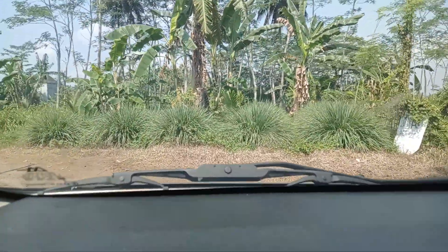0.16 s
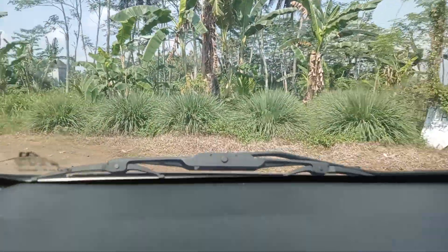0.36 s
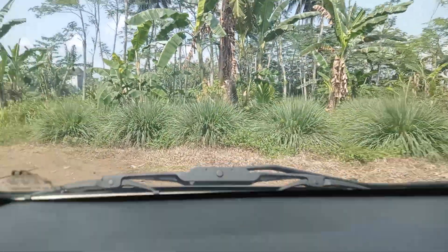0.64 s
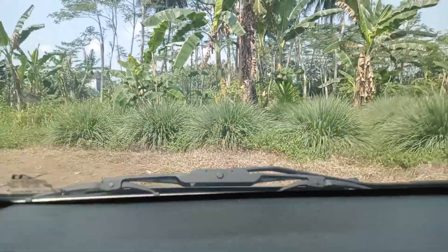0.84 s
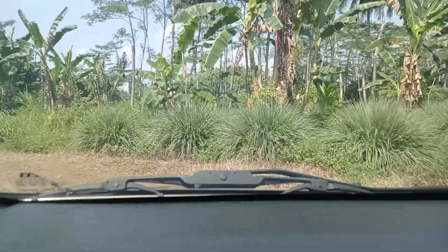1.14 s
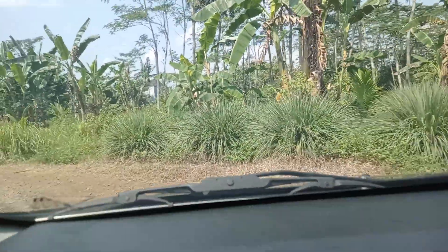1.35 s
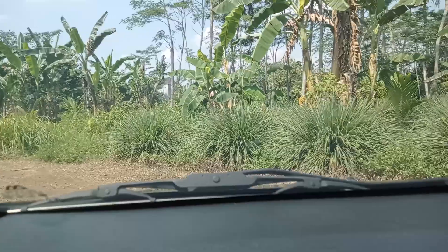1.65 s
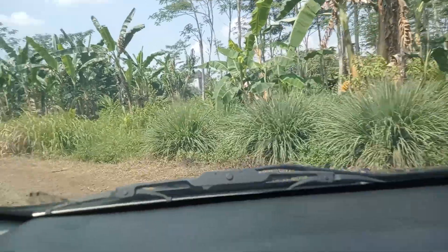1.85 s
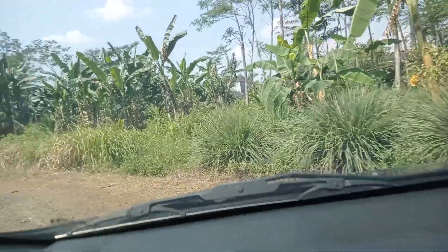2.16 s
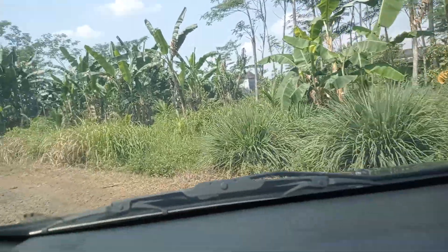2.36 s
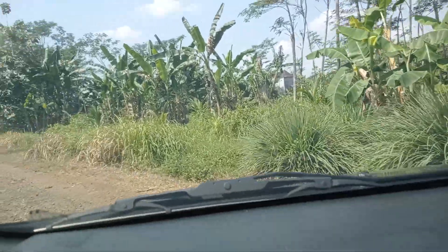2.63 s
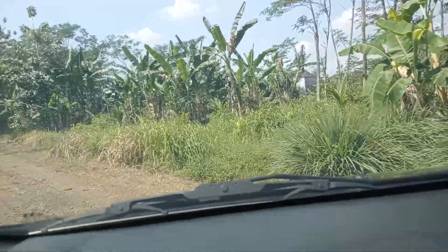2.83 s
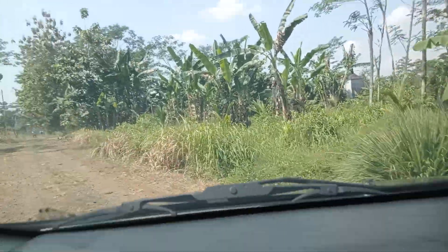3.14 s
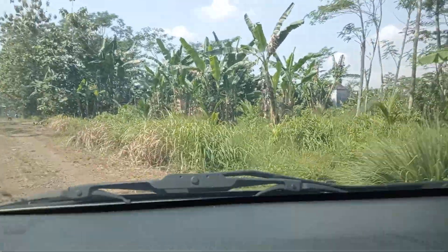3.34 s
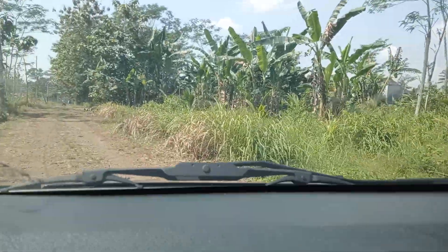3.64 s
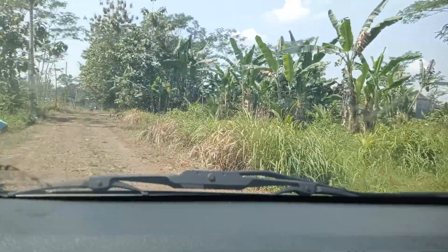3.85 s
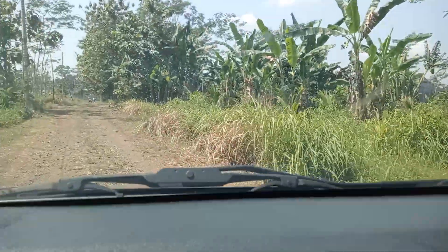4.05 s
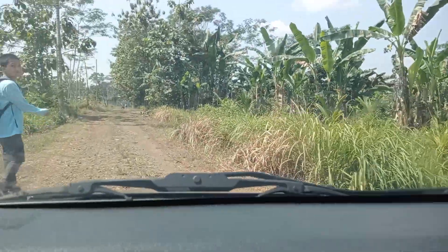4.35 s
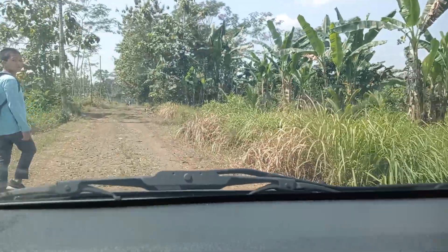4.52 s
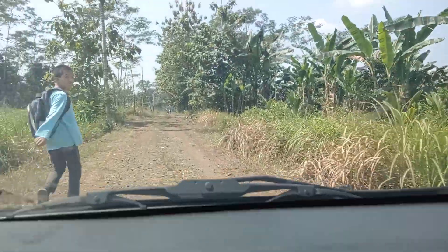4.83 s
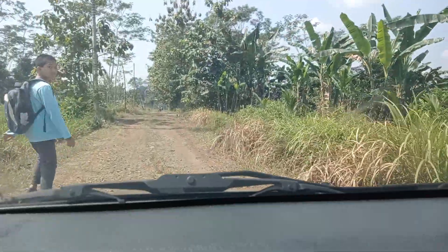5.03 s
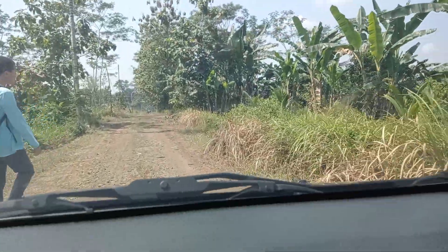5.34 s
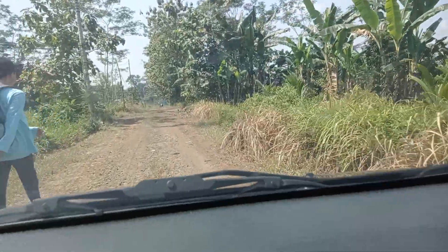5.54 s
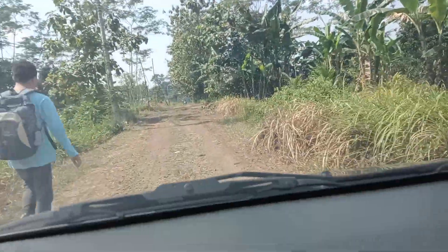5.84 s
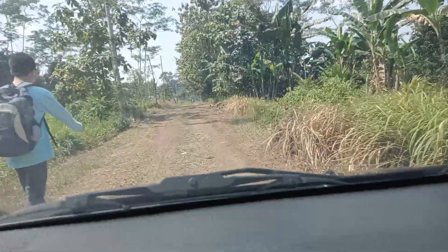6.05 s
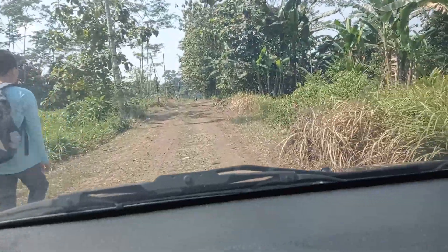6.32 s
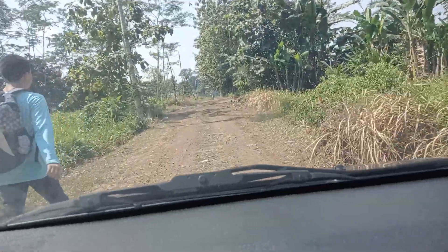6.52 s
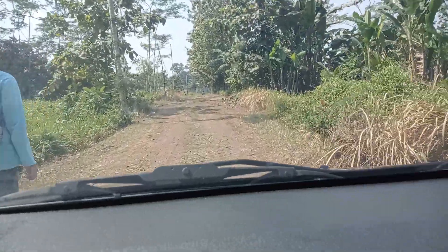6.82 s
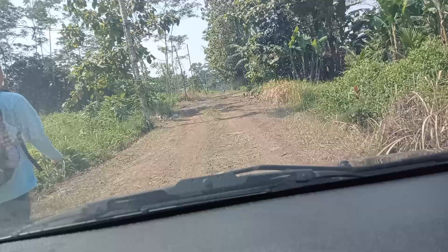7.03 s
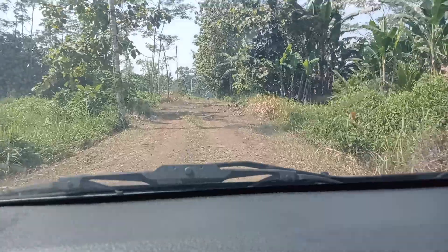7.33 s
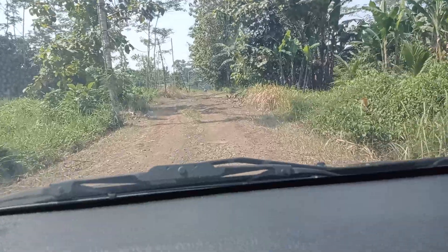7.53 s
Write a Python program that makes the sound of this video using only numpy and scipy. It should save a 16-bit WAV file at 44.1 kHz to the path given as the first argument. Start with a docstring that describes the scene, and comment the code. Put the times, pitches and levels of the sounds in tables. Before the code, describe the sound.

Inside a small car creeping over a rough dirt track, with low rumble, tyre thuds, suspension knocks and light metal clinks.

```python
"""Small car on a dirt track

One microphone inside the cabin as the car creeps over rough ground. Stones under the tyres
shake the body and make it boom, the tyres slap, and the suspension knocks in the ruts.
Behind that the engine hums and whirrs low, and grit hisses and cracks under the tread.
Close by, a small metal piece clinks with the jolts and the plastic trim ticks and rubs."""
import sys
import numpy as np
from scipy import signal
from scipy.fft import rfft, irfft, next_fast_len
from scipy.io import wavfile
from scipy.ndimage import uniform_filter1d

SR = 44100
rng = np.random.default_rng(int(sys.argv[2]) if len(sys.argv) > 2 else 0)


def digitize_waveform(pressure):
    """Quantize a signal to 16-bit integers and store it at the path in sys.argv[1].

    Rows of a 2-D input are taken as channels; values are limited to [-1, 1].
    """
    field = np.atleast_2d(pressure).T
    bounded = np.clip(field, -1, 1)
    quanta = np.round(bounded * 32767).astype(np.int16)
    wavfile.write(sys.argv[1], SR, quanta)


N = 338582
TIME = np.arange(N) / SR

# How hard the ground shakes the car between bumps, rising with speed and stoniness.
# Each row: time in seconds, relative level in dB.
GROUND_SHAKE = [(0.0, 3.5), (0.1, -6.5), (0.22, 1), (0.45, -0.5), (0.85, -5), (1.15, -1), (1.6, -2.5),
                (2.0, -3), (2.45, -9), (3.0, -6), (3.42, -7.5), (3.8, 2), (4.4, -3.5), (4.95, -1.5),
                (5.75, 1), (6.38, -0.5), (6.53, -1), (6.7, 2), (7.05, -5.5), (7.18, -0.5), (7.4, -5.5),
                (7.68, 3.5)]
# The background's rise and fall. Each row: time in seconds, relative level of engine whirr and
# stone crunch in dB, relative level of fine grit in dB.
BACKGROUND_LEVELS = [(0.0, -58, -76), (1.45, -57.5, -78.5), (1.84, -56.5, -74), (2.56, -57, -78),
                     (2.89, -59, -79.5), (3.18, -59.5, -80.5), (3.87, -53, -71.5), (4.27, -54, -70.5),
                     (4.55, -55, -74.5), (4.9, -52, -68.5), (5.17, -54.5, -74), (6.2, -55.5, -76.5),
                     (6.95, -53.5, -72), (7.68, -56, -77)]
# Spectra of fine grit, cracking stone and a dull blow. Each row: frequency in Hz, gain in dB.
GRIT_SPECTRUM = [(3000, -14), (5500, -5), (6400, -9), (7500, -7), (8400, -4), (9400, 2), (10400, -4),
                 (11600, -5), (12500, -9), (13500, -9), (14300, -12), (15500, -12)]
STONE_SPECTRUM = [(700, -10), (1500, -1), (2100, 2), (2700, -1), (3600, -8), (4700, -19), (6500, -34)]
BLOW_SPECTRUM = [(80, -36), (170, 7), (260, -12), (360, -4.5), (520, -6), (720, -10.5), (950, -12),
                 (2000, -31.5), (5000, -103)]


def from_db(db):
    """Decibels to amplitude."""
    return 10 ** (np.asarray(db) / 20)


def unit_rms(x):
    """Scale to an rms of 1."""
    return x / np.sqrt(np.mean(x ** 2) + 1e-20)


def even(x, span_s):
    """Hold the rms near 1 over the span, keeping the faster texture."""
    size = max(int(span_s * SR), 2)
    power = uniform_filter1d(uniform_filter1d(x * x, size), size)
    return x / np.sqrt(np.abs(power) + 1e-12)


def curves(rows):
    """Each column after the time column, interpolated to every sample."""
    times, *columns = np.transpose(rows)
    return [np.interp(TIME, times, column) for column in columns]


def drift(hz):
    """Random wander, mostly slower than hz, with a spread of 1."""
    rolloff = 1 + (np.fft.rfftfreq(N, 1 / SR) / hz) ** 4
    return unit_rms(irfft(rfft(rng.standard_normal(N)) / rolloff, N))


def grains(per_s, spread_db):
    """Random impacts, many small and a few large."""
    sizes = from_db(spread_db * np.minimum(rng.exponential(1, N), 4))
    return (rng.random(N) < per_s / SR) * sizes * rng.choice([-1, 1], N)


def strike_envelope(t, rise_s, length_s):
    """A fast rise and a slower decay, with a peak of 1."""
    rise = (1 - np.exp(-1.5 * t / max(rise_s, .0002))) ** 2
    shape = rise * np.exp(-2 * t / max(length_s, .002))
    return shape / shape.max()


def swells(rows):
    """A smooth rise and fall for each row of start, end and dB."""
    return sum(from_db(db) * np.sin(np.pi * np.clip((TIME - start) / (end - start), 0, 1))
               for start, end, db in rows)


def add(track, start_s, sound):
    """Mix a sound in at a time."""
    start = max(round(start_s * SR), 0)
    track[start:start + len(sound)] += sound[:N - start]


def colour(x, spectrum):
    """Minimum-phase filter through (Hz, dB) points, falling away above the last; unit power gain."""
    size = 2 * next_fast_len(len(x) // 2 + SR // 10)
    hz, db = np.transpose(spectrum)
    octave = np.log2(np.fft.rfftfreq(size, 1 / SR) + 1)
    rolloff_db = 20 * np.maximum(octave - np.log2(hz[-1]), 0)
    gain = unit_rms(from_db(np.interp(octave, np.log2(hz), db) - rolloff_db))
    cepstrum = irfft(np.log(gain))[:size // 2]
    cepstrum[1:] *= 2
    return irfft(rfft(x, size) * np.exp(rfft(cepstrum, size)))[:len(x)]


def resonance(x, hz, width_hz, lift_db):
    """Raise one band, or dip it if the lift is negative."""
    band = signal.lfilter(*signal.iirpeak(hz, hz / width_hz, fs=SR), x)
    return x + (from_db(lift_db) - 1) * band


def chatter(length_s, rise_s, spectrum, ring_hz, ring_db, q):
    """A burst of contacts on a ringing part; it swells fast and dies away."""
    t = TIME[:SR // 5]
    contacts = rng.standard_normal(len(t)) * from_db(4.0 * rng.standard_normal(len(t)))
    ringing = resonance(colour(contacts, spectrum), ring_hz, ring_hz / q, ring_db)
    return .5 * even(ringing, span_s=0.0047) * strike_envelope(t, rise_s, length_s)


def cabin(x, depth=0.42):
    """Cabin air and panels lift narrow bands of what passes through."""
    # Resonances. Each row: frequency in Hz, width in Hz, lift in dB at a depth of 1.
    cabin_modes = [(200, 20, 2), (328, 20, 2.5), (364, 18, 4), (408, 20, 2.5), (495, 20, 2), (538, 28, 4),
                   (622, 24, 5), (715, 26, 3.5), (987, 30, 3.5), (1108, 35, 3.5), (1814, 70, 3),
                   (2120, 95, 6), (3620, 140, 5)]
    for hz, width_hz, lift_db in cabin_modes:
        x = resonance(x, hz, width_hz, lift_db * depth)
    return x


def reflections(x, wet_db, t60_s=0.062):
    """Glass and dashboard throw back a short, dense cluster of echoes."""
    t = TIME[:SR // 8]
    echoes = rng.standard_normal(len(t)) * from_db(-60 * t / t60_s) * (t > .001)
    return x + from_db(wet_db) * signal.fftconvolve(x, echoes / np.linalg.norm(echoes))[:N]


def engine(hum_db=-48.0, whirr_gain_db=2.5, throb=0.018, wander=0.0195):
    """The first three firing orders hum; valve gear whirrs, pulsing faintly with each firing."""
    # Engine speed. Each row: time in seconds, firings per second.
    firing_rates = [(0, 48), (1.2, 52), (2.0, 62), (2.6, 55), (3.2, 39), (3.8, 86), (5.0, 80), (6.3, 79),
                    (7.68, 42)]
    # Valve-gear spectrum. Each row: frequency in Hz, gain in dB.
    gear_spectrum = [(400, -2), (700, 11.5), (1000, 1.5), (1400, -0.5), (1850, 3.5), (2200, -0.5),
                     (2900, -3), (3700, -6.5), (4300, -9.5), (5000, -19), (5600, -16), (6500, -32),
                     (9000, -40)]
    firing_hz, = curves(firing_rates)
    shake_db, = curves(GROUND_SHAKE)
    whirr_db, _ = curves(BACKGROUND_LEVELS)
    phase = 2 * np.pi * np.cumsum(firing_hz * (1 + wander * drift(4.36))) / SR
    hum = sum(from_db(-7 * k) * np.sin((k + 1) * phase) for k in range(3))
    flutter = from_db(1.6 * drift(35))
    gear = rng.standard_normal(N) * (1 + throb * np.cos(phase)) * flutter
    # The whirr comes through the bulkhead and takes on its resonances in full.
    whirr = unit_rms(cabin(colour(gear, gear_spectrum), depth=1.0))
    return from_db(hum_db + 0.6 * shake_db) * hum + from_db(whirr_db + whirr_gain_db) * whirr


def grit(hiss_db=2.5, crackle_db=-1.5, crunch_db=-7.0):
    """Sand hisses under the tread; small stones crackle and crunch in clumps."""
    # Loose gravel, where the crunch swells. Each row: start and end in seconds, level in dB.
    loose_patches = [(0.72, 0.77, -61), (1.43, 1.50, -59), (1.75, 1.79, -59), (4.52, 4.56, -57),
                     (4.80, 4.85, -53), (4.865, 4.91, -50), (7.03, 7.13, -53)]
    coarse_db, fine_db = curves(BACKGROUND_LEVELS)
    flutter = from_db(1.1 * drift(30))
    hiss = unit_rms(colour(rng.standard_normal(N) * flutter, GRIT_SPECTRUM))
    clumps = from_db(5.0 * np.tanh(drift(22)))
    chips = sum(resonance(grains(30, 2.3), hz, width_hz=450, lift_db=16.0)
                for hz in np.linspace(8000, 11500, 6))
    crackle = unit_rms(reflections(colour(chips, GRIT_SPECTRUM), wet_db=-3.0))
    stones = colour(grains(600, 1.8) * clumps, STONE_SPECTRUM)
    crunch = unit_rms(reflections(cabin(stones), wet_db=-5.0))
    sand = from_db(fine_db) * (from_db(hiss_db) * hiss + from_db(crackle_db) * crackle)
    return sand + (from_db(coarse_db + crunch_db) + swells(loose_patches)) * crunch


def stone_pings(gain_db=1.5, length_s=0.015, rise_s=.0003):
    """Chips of stone flung off the tread ping against the underside."""
    # Each row: start in seconds, relative level in dB, ring in Hz.
    pings = [(1.455, -58, 9800), (1.977, -52.5, 9800), (2.029, -56, 9240), (2.1435, -57, 9390),
             (3.2355, -57, 9410), (3.915, -52, 8250), (4.188, -55, 9410), (4.223, -52, 9300),
             (4.257, -54, 9600), (4.322, -46.5, 9350), (4.349, -47.5, 9530), (4.464, -53, 9130),
             (5.0271, -53, 9290)]
    out = np.zeros(N)
    for start_s, db, hz in pings:
        ping = chatter(length_s, rise_s, GRIT_SPECTRUM, hz, ring_db=17.0, q=12.0)
        add(out, start_s, from_db(db + gain_db) * ping)
    return out


def stone_cracks(length_s=0.018, rise_s=.001):
    """A stone splits or shoots out from under the tread with a short, dry crack."""
    # Each row: start in seconds, level in dB, ring in Hz.
    cracks = [(0.611, -48, 3700), (0.727, -53, 2800), (0.882, -55, 1700), (1.253, -51, 1500),
              (1.382, -47, 1300), (1.433, -43, 1220), (1.692, -46, 1600), (2.245, -49.5, 3420),
              (2.753, -51, 2200), (3.502, -44.5, 3020), (3.542, -43, 1300), (4.003, -45, 3300),
              (4.176, -44, 1850), (4.443, -42.5, 1214), (4.735, -42, 1900), (4.769, -41.5, 2100),
              (5.147, -44.5, 1700), (5.19, -45, 2500), (5.479, -44, 3120), (5.742, -42.5, 2100),
              (6.218, -42, 2210), (6.468, -45, 2490), (6.616, -45, 1800), (6.854, -43, 3800)]
    out = np.zeros(N)
    for start_s, db, hz in cracks:
        crack = chatter(length_s, rise_s, STONE_SPECTRUM, hz, ring_db=13.0, q=3.0)
        add(out, start_s, from_db(db) * crack)
    return cabin(out)


def plastic_trim(tick_gain_db=2.5, rise_s=.001):
    """Trim ticks when the body twists, now and then slides with a soft hiss, and squeaks once."""
    # Each row: start in seconds, relative level in dB, ring in Hz, ring lift in dB, length in seconds.
    ticks = [(0.164, -49.5, 5530, 2, 0.026), (0.301, -45, 10000, 8, 0.032), (1.079, -39.5, 2780, 16, 0.012),
             (1.072, -45, 9500, 13, 0.035), (1.438, -57, 13500, 30, 0.013), (1.886, -50, 4300, 5, 0.02),
             (3.826, -48, 10700, 9, 0.015), (4.395, -49, 10500, 10, 0.078), (5.635, -49, 5670, 20, 0.012),
             (5.947, -40, 2050, 22, 0.011), (6.951, -42, 10100, 2, 0.021)]
    # Spectrum of a tick. Each row: frequency in Hz, gain in dB.
    plastic_spectrum = [(1000, 7), (2500, 4), (3800, 6.5), (4800, -4.5), (5600, -3), (6700, -14.5),
                        (9400, -3), (11500, -11), (15500, -18)]
    # The trim sticks and slips: start in seconds, peak in dB, pitch in Hz, length in seconds.
    squeak = (6.3575, -37.5, 3560, .0036)
    # Spells of sliding. Each row: start and end in seconds, level in dB.
    rubs = [(0.253, 0.40, -63.5), (2.25, 2.8, -74), (4.142, 4.413, -66), (5.91, 6.12, -61.5),
            (6.5, 6.76, -67.5)]
    out = np.zeros(N)
    for start_s, db, ring_hz, ring_db, length_s in ticks:
        tick = chatter(length_s, rise_s, plastic_spectrum, ring_hz, ring_db, q=11.0)
        add(out, start_s, from_db(db + tick_gain_db) * tick)
    start_s, db, hz, length_s = squeak
    t = TIME[TIME < length_s]
    add(out, start_s, from_db(db) * np.sin(np.pi * t / length_s) * np.sin(2 * np.pi * hz * t))
    slips = grains(3500, 3.2) * from_db(1.8 * drift(45))
    return out + swells(rubs) * unit_rms(colour(slips, GRIT_SPECTRUM))


def metal_clinks(ring_gain_db=-2.0, scrape_db=-3.0, damping=1.2, contact_s=.001, rebound_s=0.042):
    """A small metal piece strikes, scrapes, chatters and rebounds."""
    # Each row: start in seconds, relative level in dB, low ring against high ring in dB,
    # low ring in Hz, rebound against strike in dB.
    clinks = [(0.244, -46.5, 8, 3740, -27), (0.839, -47, 2.5, 3610, -22), (1.0763, -49, 6, 3360, -22),
              (1.298, -50, 7.5, 3700, -12), (1.6496, -54, 8, 3630, -9), (3.296, -38.5, -1, 3610, -24),
              (3.827, -34, 2, 3710, -20), (4.398, -34, 2.5, 3660, -16), (4.654, -51, 3, 3440, -5),
              (4.934, -38.5, 6.5, 3487, -24), (5.6382, -44, 5, 3770, -8), (6.303, -57, 8, 3560, -20),
              (7.226, -43.5, 4.5, 3600, -17)]
    # Each row: frequency in Hz, relative level in dB, t60 in seconds before the extra damping.
    metal_modes = [(3200, -13, .025), (3450, -9, .035), (3600, -2, .045), (3740, -6, .03),
                   (4400, -18, .035), (5640, -17, .03), (7620, -11, .04), (7755, -7, .05), (8045, -10, .04),
                   (8200, -6, .045), (8330, -8, .04), (8480, -11, .035), (9020, -13, .025),
                   (9350, -14, .03)]
    # Metal scraping on plastic. Each row: frequency in Hz, gain in dB.
    scrape_spectrum = [(2400, -12), (3500, 5.5), (4700, -17), (6600, -10.5), (7800, 0), (9500, -4.5),
                       (12000, -22), (15500, -20)]
    hz, mode_db, t60 = np.transpose(metal_modes)[:, :, None]
    is_low = hz < 5000
    t = TIME[:SR // 10]
    decay_db = 60 * damping * t / t60
    attack = 1 - np.exp(-t / contact_s)
    out = np.zeros(N)
    for start_s, db, low_db, low_hz, rebound_db in clinks:
        # How the piece hangs shifts its low ring, near 3600 Hz, from one jolt to the next.
        shift = np.where(is_low, low_hz / 3600, 1)
        pitch = hz * shift * (1 + .006 * rng.standard_normal(hz.shape))
        ring_db = db + ring_gain_db + mode_db + low_db * is_low
        for delay_s, bounce_db in [(0, 0), (.005, -8), (rebound_s, rebound_db)]:
            strike_db = ring_db + bounce_db + rng.normal(0, 3.2, hz.shape)
            signs = rng.choice([-1, 1], hz.shape)
            modes = from_db(strike_db - decay_db) * np.sin(2 * np.pi * pitch * t) * signs
            add(out, start_s + delay_s * rng.uniform(.9, 1.1), modes.sum(axis=0) * attack)
        scrape = chatter(0.021, 0.00045, scrape_spectrum, ring_hz=8200, ring_db=-10.0, q=5.7)
        add(out, start_s, from_db(db + scrape_db) * scrape)
    return reflections(out, wet_db=-10.0)


def body_blow(length_s, rise_s, thud_db, rattle_db, ring_hz, ring_db, tail_db=-15.0):
    """A dull thud and a brighter rattle ring the same panel, then loose parts settle unevenly."""
    # Loose parts rattling. Each row: frequency in Hz, gain in dB.
    rattle_spectrum = [(400, -18), (700, -3), (1000, -2), (1300, 1), (1700, 0), (2300, -5), (3500, -14),
                       (5000, -30)]
    thud = chatter(length_s, rise_s, BLOW_SPECTRUM, ring_hz, ring_db, q=14.0)
    rattle = chatter(length_s, rise_s, rattle_spectrum, ring_hz, ring_db, q=14.0)
    tail = chatter(length_s * 2.1, length_s, rattle_spectrum, ring_hz, ring_db, q=14.0)
    wobble = unit_rms(uniform_filter1d(rng.standard_normal(len(tail)), SR // 200))
    settling = from_db(tail_db + 5 * np.tanh(wobble)) * tail
    return from_db(thud_db) * thud + from_db(rattle_db) * (rattle + settling)


def suspension_knocks(floor_hz=342, floor_ring_db=30.5, floor_length_s=0.028):
    """A wheel drops into a rut: one blow rings a panel and another thumps through the floor pan."""
    # Each row: start in seconds, thud and rattle in dB, length and rise in seconds, panel ring in Hz,
    # ring lift in dB, lag of the floor thump in seconds (negative when it comes first).
    knocks = [(0.175, -39, -49, 0.029, 0.0015, 1280, 10, -0.014),
              (0.479, -51, -43.5, 0.025, .002, 570, -3, 0.0029),
              (0.772, -43.5, -48, 0.032, 0.00079, 800, 6, -0.0066),
              (0.936, -34, -40, 0.022, 0.00041, 1490, 28, 0.043),
              (1.486, -40, -51, 0.026, .0005, 680, 12, 0.023),
              (1.529, -38, -43, 0.024, 0.00077, 674, 6, 0.0017),
              (1.562, -42, -45, 0.059, .001, 1270, 11, 0.0031),
              (1.756, -45, -44.5, 0.03, .001, 1440, 17, -0.0046),
              (2.142, -32.5, -58, 0.013, 0.0017, 500, 21, 0.052),
              (2.537, -62, -48.5, 0.052, 0.002, 1140, 11, 0.014),
              (3.499, -38.5, -42, 0.025, 0.00041, 1000, 9, 0.02),
              (3.742, -36.5, -41, .026, 0.0012, 1500, 5, 0.0052),
              (3.832, -29.5, -45, 0.032, 0.0023, 1130, 12, 0.021),
              (3.864, -37, -43, 0.022, 0.0018, 1120, 7, -0.0016),
              (4.019, -28.5, -43.5, 0.028, 0.009, 510, 3, 0.022),
              (4.042, -31.5, -46, 0.031, 0.0048, 836, 13, 0.0073),
              (4.279, -33.5, -42, 0.026, 0.007, 1950, 7, -0.017),
              (4.297, -31, -46, 0.03, .003, 690, -2, .02),
              (5.433, -27.5, -48, 0.065, .002, 546, 10.5, 0.0052),
              (5.71, -35.5, -42, 0.032, .002, 1060, 2, 0.024),
              (5.824, -30, -45, 0.052, 0.0061, 714, 12, 0.021),
              (6.658, -29.5, -58, 0.034, 0.012, 543, 16.5, 0.0075),
              (6.949, -44, -39.5, 0.037, 0.0034, 1170, 24, 0.037),
              (7.224, -29, -49, 0.053, 0.0025, 1000, 3, 0.022),
              (7.238, -35.5, -42.5, 0.056, 0.0029, 716, 14, 0.028),
              (7.63, -49, -41.5, 0.064, 0.028, 1330, 7, -0.024)]
    out = np.zeros(N)
    for start_s, thud_db, rattle_db, length_s, rise_s, panel_hz, ring_db, lag_s in knocks:
        add(out, start_s, body_blow(length_s, rise_s, thud_db, rattle_db, panel_hz, ring_db))
        floor = body_blow(min(floor_length_s, length_s), rise_s, thud_db - 2.5, rattle_db - 6.5,
                          floor_hz, floor_ring_db)
        add(out, start_s + lag_s, floor)
    return cabin(out, depth=1.5)  # a direct blow rings the cabin more deeply


def tyre_slaps(roughness=0.16, rise_s=0.0096, sag_share=0.263, sag_s=0.049):
    """A tyre slaps over a stone and rings with a low, uneven note that sags as the tyre relaxes."""
    # Each row: start in seconds, peak in dB, starting note in Hz, length in seconds.
    slaps = [(0.145, -35, 385, 0.028), (0.226, -28, 140, 0.048), (0.28, -34.5, 377, 0.02),
             (0.369, -26.5, 110.6, 0.058), (0.481, -25, 100, .035), (0.522, -25, 118.5, 0.045),
             (0.612, -31, 90.5, 0.043), (0.963, -33, 367, 0.01), (0.995, -28.5, 179, 0.045),
             (1.085, -27, 118, 0.026), (1.463, -25, 77.4, 0.029), (3.69, -25, 91, 0.032),
             (3.763, -26.5, 88, .03), (3.835, -21, 181, 0.012), (3.87, -28.5, 350, 0.027),
             (3.958, -25, 85, 0.029), (4.04, -24, 99, 0.017), (4.096, -24, 83, 0.048),
             (4.167, -23.5, 80, 0.02), (4.253, -20.5, 75, 0.041), (4.295, -23.5, 171, 0.045),
             (4.335, -25.5, 230, .04), (4.508, -25, 100, 0.051), (4.626, -26, 90, 0.025),
             (4.815, -30, 132, 0.033), (5.14, -23.5, 150, 0.038), (5.255, -24, 96.6, 0.027),
             (5.533, -21.5, 82.2, 0.032), (5.833, -22, 129, .034), (5.972, -25, 138, 0.035),
             (6.655, -27, 353, 0.031), (6.699, -26.5, 152, 0.05), (6.795, -24, 128, .03),
             (6.908, -23, 152, 0.043), (7.058, -22, 102, 0.023), (7.249, -34, 243, 0.036)]
    t = TIME[:SR // 5]
    sag = 1 - sag_share * (1 - np.exp(-t / sag_s))
    out = np.zeros(N)
    for start_s, db, hz, length_s in slaps:
        phase = 2 * np.pi * np.cumsum(hz * sag) / SR
        note = np.sin(phase + rng.uniform(0, 2 * np.pi)) * strike_envelope(t, rise_s, length_s)
        scuff = chatter(length_s, rise_s, BLOW_SPECTRUM, hz, ring_db=18.0, q=3.0)
        add(out, start_s, from_db(db) * (note + roughness * scuff))
    return out


def bump_envelopes(compress_s=0.045):
    """Boom and thud swell while the spring compresses, then die; overlapping bumps add in power."""
    # Humps and hollows. Each row: start in seconds, body boom in dB, tyre thud in dB.
    bumps = [(0.26, -34, -55), (0.45, -36, -34.5), (0.6, -33, -39), (0.93, -41, -35.5), (1.04, -33, -42),
             (1.22, -37, -43), (3.13, -34.5, -39.5), (3.49, -40, -37.5), (3.84, -31.5, -32.5),
             (3.98, -28, -31.5), (4.35, -27.5, -35), (4.491, -32, -34.5), (4.73, -33, -33),
             (4.81, -42, -32), (5.08, -31, -39), (5.69, -31.5, -33), (5.78, -46, -30.5), (6.07, -33, -34),
             (6.3, -40, -39), (6.64, -50, -29), (6.89, -39, -30.5), (7.0, -28, -33), (7.22, -40, -34.5),
             (7.35, -32, -52), (7.609, -27.5, -33.5)]
    start_s, boom_db, thud_db = np.transpose(bumps)
    t = TIME[::40]
    age = np.maximum(t - start_s[:, None], 0) / compress_s
    power = (age * np.exp(1 - age)) ** 2
    return [np.interp(TIME, t, np.sqrt(from_db(db) ** 2 @ power)) for db in (boom_db, thud_db)]


def road_rumble(boom_db=-35.0, thud_db=-36.5, lurch_db=2.5, jolt_db=3.0):
    """Lumps boom in the body, stones thud through the tyres, pebbles rattle the panels."""
    # Spectra of body boom, tyre thud and panel clatter. Each row: frequency in Hz, gain in dB.
    boom_spectrum = [(15, -36), (25, -22), (32, -7.5), (42, 0), (62, 8), (80, 10.5), (105, 3), (140, -6),
                     (250, -60)]
    thud_spectrum = [(60, -27), (100, -2.5), (125, -1), (165, -1), (205, -2.5), (255, -12.5), (330, -17),
                     (600, -64)]
    clatter_spectrum = [(150, -12.5), (260, -0.5), (330, 2), (400, -3), (470, -8.5), (660, -12),
                        (850, -23.5), (1200, -28.5), (1800, -28.5), (3500, -48.5)]
    # Pebble rattle between bumps. Each row: time in seconds, level in dB.
    pebble_levels = [(0.0, -48), (0.38, -46.5), (0.62, -50), (1.28, -43.5), (2.27, -51), (2.37, -50),
                     (3.06, -54), (3.55, -46), (3.87, -43), (5.49, -43.5), (5.67, -46), (6.03, -46.5),
                     (6.52, -44.5), (7.04, -40.5), (7.51, -42.5), (7.68, -35)]
    shake_db, = curves(GROUND_SHAKE)
    pebble_db, = curves(pebble_levels)
    # All three layers swell at the bumps.
    bump_boom, bump_thud = bump_envelopes()
    boom_gain = np.hypot(from_db(boom_db + 0.8 * shake_db + lurch_db * drift(7.0)), bump_boom)
    thud_gain = np.hypot(from_db(thud_db + shake_db), from_db(0.5) * bump_thud)
    clatter_gain = np.hypot(from_db(pebble_db), from_db(-12.5) * bump_thud)
    lumps = even(colour(grains(400, 0.78), boom_spectrum), span_s=0.061)
    stones = even(cabin(colour(grains(500, 3.2), thud_spectrum)), span_s=0.16)
    pebbles = even(cabin(colour(grains(900, 0.95), clatter_spectrum)), span_s=0.84)
    pebbles *= from_db(jolt_db * drift(16.0))
    return boom_gain * lumps + thud_gain * stones + clatter_gain * pebbles


def scene():
    """Everything as it meets at one spot in the cabin, in mono."""
    rolling = road_rumble() + engine() + grit() + stone_cracks() + stone_pings()
    return (rolling + suspension_knocks() + tyre_slaps() + metal_clinks() + plastic_trim())[None]


def record(dry, cutoff_hz=15450):
    """The microphone's signal, with the top cut steeply."""
    return signal.sosfilt(signal.ellip(12, .1, 90, cutoff_hz, fs=SR, output="sos"), dry)


dry = scene()
out = record(dry)
digitize_waveform(out)
```